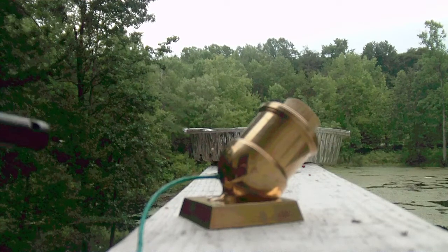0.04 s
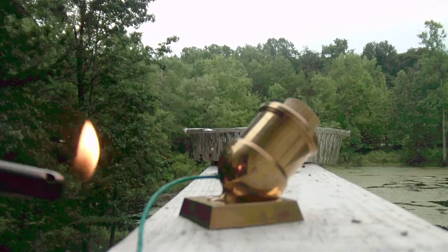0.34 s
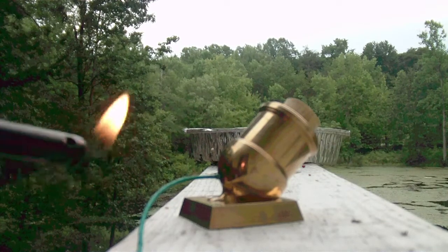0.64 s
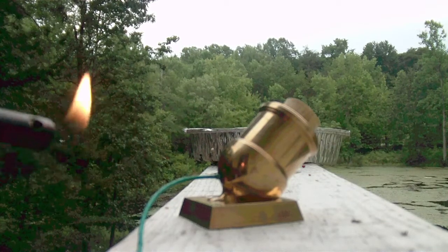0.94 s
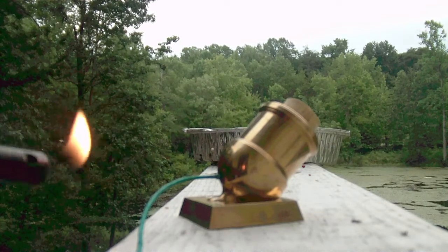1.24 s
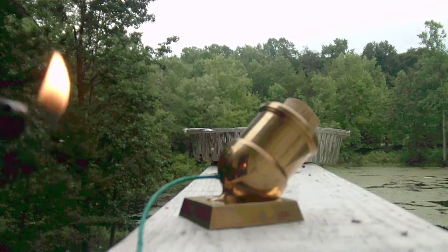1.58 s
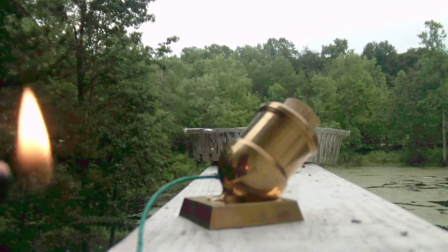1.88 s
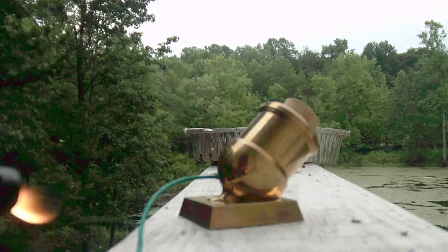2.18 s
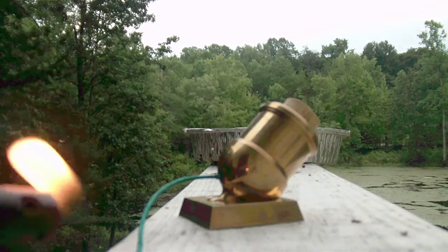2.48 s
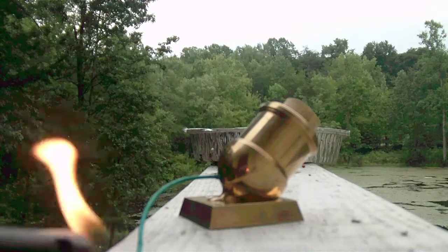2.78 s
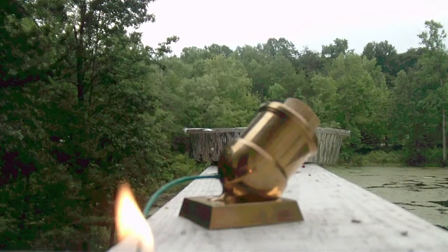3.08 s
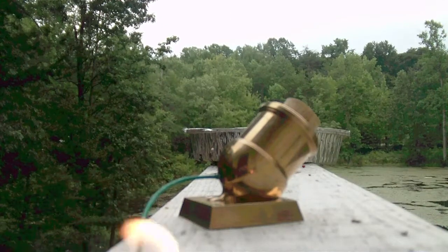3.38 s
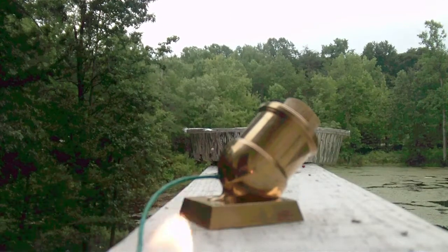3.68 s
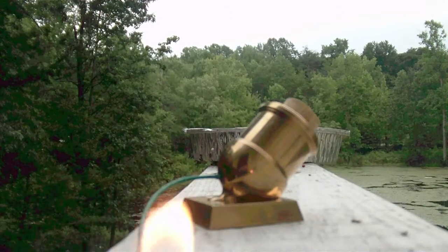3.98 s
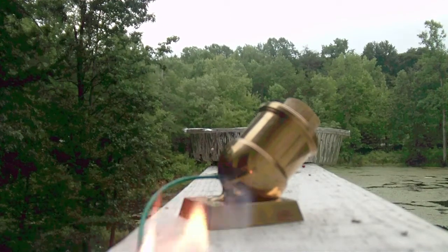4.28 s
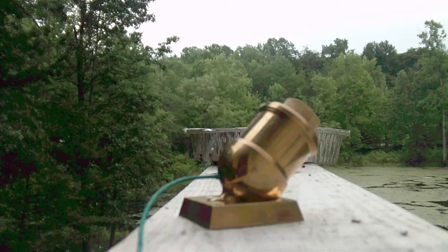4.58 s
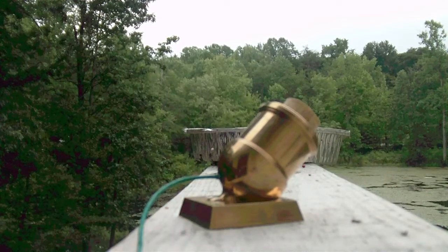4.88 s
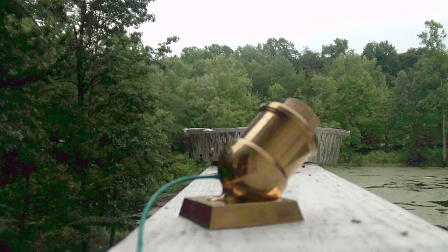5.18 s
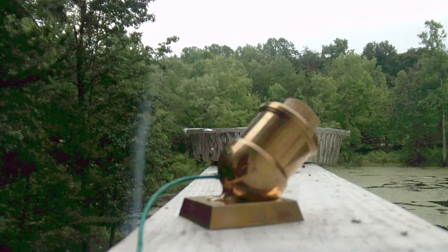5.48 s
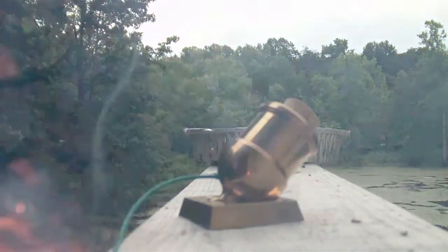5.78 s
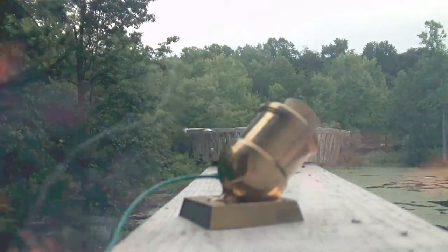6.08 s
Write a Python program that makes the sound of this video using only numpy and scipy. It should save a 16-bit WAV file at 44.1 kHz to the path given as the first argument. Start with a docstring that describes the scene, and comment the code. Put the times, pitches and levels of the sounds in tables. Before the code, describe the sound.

A lighter snaps on over rasping insects, then a fuse crackles and a miniature mortar goes off with a harsh bang.

```python
"""A pond with insects, a few frogs and a far bird; a small brass mortar stands on a wooden rail.
Insects scrape their wings over low rumble and rustling leaves. A gas lighter snaps on and hisses.
The fuse spits and flares as powder grains burst, and the mortar fires with a shriek of gas.
The blast overloads the close microphone and rolls back from the trees; smoke buffets the port."""
import sys
import numpy as np
from scipy import signal
from scipy.fft import rfft, irfft
from scipy.io import wavfile

SR = 44100
rng = np.random.default_rng(int(sys.argv[2]) if len(sys.argv) > 2 else 0)


def generate_wav(sig):
    """Save sig (samples, or channels by samples) to the path in sys.argv[1] as 16-bit PCM at SR."""
    pcm = np.round(np.clip(np.atleast_2d(sig).T, -1, 1) * 32767).astype(np.int16)
    wavfile.write(sys.argv[1], SR, pcm)


N = 270774
T = np.arange(N) / SR
GAS_OFF_S, FIRE_S = 4.49, 5.6455

# air rumble, far leaves: (frequency [Hz], density [dB])
RUMBLE_SPECTRUM = [(16, -37), (28, 4), (54, 4), (141, -3.5), (198, -10), (232, -12.5), (400, -10),
                   (520, -49), (880, -120)]
RUSTLE_SPECTRUM = [(120, 9.5), (250, 10), (420, 5), (700, 1.5), (1500, -2.5), (2700, -1.5), (4500, 5),
                   (5500, 1), (6500, -2.5), (8500, -7.5), (9800, -8), (11000, -17), (15500, -20)]
# common swell of leaves and insects: (time [s], gain [dB])
BACKGROUND_SWELL = [(0, 2), (.6, -1.5), (1.5, -4), (1.7, -6), (2.15, -5), (2.24, -3), (2.85, 2.5),
                    (3.65, 1), (4.45, 5.5), (5.1, 1.5), (5.6, 0)]
# insect chorus: (time [s], level [dB])
CHORUS_LEVEL = [(0, -48.5), (.8, -55), (2.1, -54.5), (2.7, -45), (3.8, -47), (4.35, -37), (4.65, -74),
                (5.6, -45)]
# chorus bands: (centre [Hz], width [Hz], gain [dB])
CHORUS_BANDS = [(4905, 290, -2.5), (7290, 570, -1), (9550, 260, -16), (11800, 150, -26)]
# further katydid rasps: the main katydid's first call, then a neighbour's answers: (centre [s], level [dB])
KATYDID_EXTRA_CALLS = [(.05, -42.5), (.282, -43.5), (.48, -44), (4.85, -48), (5.2, -45)]
# igniter and trigger blows: (time [s], gain [dB], contact cutoff [Hz])
LIGHTER_SNAPS = [(.197, 6.5, 14000), (0.1989, -4, 6000), (.2112, -38, 3000)]
# lighter barrel modes: (frequency [Hz], gain [dB], t60 [s])
LIGHTER_MODES = [(930, -15.5, 0.034), (1584, -9, 0.057), (1760, -9, 0.049), (2990, -4, 0.033),
                 (3320, -6.5, 0.03), (4190, 3, 0.015), (4550, -0.5, 0.021), (6800, -2, 0.031),
                 (6880, -2, 0.039), (7160, 3.5, 0.029), (10600, -11, 0.058)]
# gas jet as the nozzle moves: (time [s], level [dB])
GAS_LEVEL = [(.25, -49), (.57, -67), (.95, -49), (1.5, -46.5), (1.7, -57), (2.15, -68), (2.2, -52),
             (2.71, -50), (2.75, -39.5), (2.97, -39), (3.38, -53), (4.4, -44)]
# gas jet: (frequency [Hz], density [dB])
GAS_SPECTRUM = [(1000, -21), (3000, -19.5), (4550, -4), (5550, 2.5), (6450, -4.5), (7200, -0.5),
                (8300, -11.5), (9400, -10.5), (10600, -42), (15500, -34)]
# low thumps: the lighter case at its snap and release, then puffs of air at the shot: (time [s], peak [dB],
# frequency [Hz])
LOW_THUMPS = [(.21, -22, 170), (.236, -28, 99), (4.539, -23.5, 72), (5.701, -17, 74), (5.999, -0.5, 92),
              (6.008, -0.5, 130), (6.0595, 2, 128)]
# far drone: (centre [s], length [s], level [dB])
DRONE_SWELLS = [(.5, 0.42, -47.5), (2.76, 0.68, -48.5), (3.94, 0.69, -50.5), (4.824, 0.31, -45.5)]
# frog calls: (time [s], pitch [Hz], level [dB])
FROG_PLUNKS = [(.73, 376, -43.5), (.84, 384, -37.5), (1.215, 370, -42.5), (1.78, 369, -44),
               (2.315, 364, -41), (2.995, 387, -38.5), (3.33, 590, -40.5), (3.92, 281, -35),
               (4.099, 409, -34.5), (5.13, 391, -35.5)]
# sharpest fuse spits: (time [s], gain [dB])
FUSE_SPITS = [(3.8044, -4.5), (3.8439, -2), (3.9352, -1), (3.9614, -4), (3.9987, -4), (4.0286, -4.5),
              (4.0878, -6.5), (4.1051, 1), (4.2135, -2), (4.2274, 2), (4.2419, 4.5), (4.3203, 1),
              (4.3465, 1), (4.3686, -6), (4.4049, -2), (4.4255, -3), (4.5024, 6), (4.6295, -14),
              (4.8342, -10), (4.8883, -11.5), (4.9192, -13), (4.9662, -14), (4.9925, -17), (5.03, -11.5),
              (5.477, -8), (5.5067, -13), (5.5813, -12.5), (5.603, -17)]
# fuse catching, smouldering, quickening at the touch hole: (time [s], vigour [dB])
FUSE_VIGOUR = [(3.98, -12), (4.16, -8), (4.22, 0.5), (4.36, -3), (4.52, 0), (4.57, -7.5), (4.75, -16.5),
               (4.86, -7.5), (5.08, -17), (5.44, -17.5), (5.62, -7.5)]
# powder flares: (centre [s], length [s], gain [dB])
FUSE_FLARES = [(4.111, 0.0049, -11.5), (4.124, 0.0086, -17.5), (4.201, 0.014, -10.5), (4.288, 0.018, -1),
               (4.302, 0.019, -10.5), (4.457, 0.016, -12.5), (4.529, 0.0099, -9), (5.582, .0074, -27.5),
               (5.638, 0.027, -29.5)]
# hollow fuse pops: (time [s], level [dB], centre [Hz])
FUSE_POPS = [(4.467, -10.5, 3220), (4.4853, -7, 3370), (4.4877, 3.5, 3080), (4.504, -13.5, 2540)]
# roar of the shot: (frequency [Hz], density [dB])
ROAR_SPECTRUM = [(60, -26), (150, -15), (260, -6), (430, -5.5), (700, -7), (1400, -4), (2200, -2),
                 (3300, 0.5), (6000, -1), (9200, -1.5), (10400, -5.5), (11600, -12.5), (15500, -14)]
# air pushed by blast, then smoke: (time [s], level [dB])
GUST_LEVEL = [(5.64, -13), (5.7, -22.5), (5.76, -23.5), (5.87, -34), (5.92, -17.5), (6.01, -14),
              (6.14, -15)]
# that gust: (frequency [Hz], density [dB])
GUST_SPECTRUM = [(20, -16), (38, 3.5), (70, 0), (150, -3.5), (250, -10), (500, -27), (1500, -60)]


def from_db(db):
    """Decibels to gain."""
    return 10 ** (np.asarray(db) / 20)


def unit_rms(x):
    """Scale to rms 1."""
    return x / np.sqrt(np.mean(x ** 2) + 1e-20)


def level(rows):
    """Gain curve from (time [s], level [dB]) rows."""
    return from_db(np.interp(T, *np.transpose(rows)))


def butter(x, hz, kind, order=2):
    """Butterworth filter."""
    return signal.sosfilt(signal.butter(order, hz, kind, fs=SR, output="sos"), x + 1e-18)


def noise(spectrum):
    """Coloured noise, rms 1."""
    hz, db = np.transpose(spectrum)
    bins_hz = np.maximum(np.arange(N // 2 + 1) * SR / N, 1)
    gain = from_db(np.interp(np.log(bins_hz), np.log(hz), db, left=-90, right=-90))
    return unit_rms(irfft(rfft(rng.standard_normal(N)) * gain, N))


def band(hz, width_hz):
    """Band noise, rms 1."""
    edges_hz = [hz - width_hz / 2, hz + width_hz / 2]
    return unit_rms(butter(rng.standard_normal(N), edges_hz, "band", order=3))


def wander(hz):
    """Low-passed noise, rms 1."""
    return unit_rms(butter(rng.standard_normal(N), hz, "low"))


def ring(x, hz, t60_s):
    """One mode; a unit click rings at height 1."""
    r, w = from_db(-60 / (t60_s * SR)), 2 * np.pi * hz / SR
    return signal.lfilter([0, np.sin(w)], [1, -2 * r * np.cos(w), r * r], x + 1e-18)


def click(s):
    """Unit impulse."""
    return 1. * (np.arange(N) == round(s * SR))


def decay(s, t60_s):
    """Jump to 1, exponential fall."""
    return (T >= s) * np.exp(-np.log(1000) * np.clip((T - s) / t60_s, 0, 10))


def swell(s, length_s):
    """Bell envelope."""
    return np.exp(-np.minimum((2 * (T - s) / length_s) ** 2, 20))


def flat_top(s, length_s):
    """Flat envelope, abrupt ends."""
    return 1 / (1 + (2 * (T - s) / length_s) ** 8)


def wing_phase(rate_hz, jitter):
    """Phase, 0-1, of an uneven wing beat."""
    return np.cumsum(rate_hz * (1 + jitter * wander(10))) / SR % 1


def call_times(first_s, period_s, slowing_s, count):
    """Onsets; the period grows by slowing_s per call."""
    k = np.arange(count)
    return first_s + period_s * k + slowing_s * k ** 2 / 2


def air(background):
    """Low rumble and far rustling leaves."""
    return from_db(-44.5) * noise(RUMBLE_SPECTRUM) + from_db(-45) * background * noise(RUSTLE_SPECTRUM)


def chorus():
    """Massed insects: narrow bands pulsed by wing strokes."""
    bands = sum(from_db(db) * band(hz, width_hz) for hz, width_hz, db in CHORUS_BANDS)
    pulsing = .62 + .25 * np.sin(np.pi * wing_phase(48, jitter=.113)) ** 2
    return level(CHORUS_LEVEL) * bands * pulsing


def cricket(background, centre_hz=6040, sag_hz=240, end_s=4.4):
    """Even trill, blurred by leaves; pitch sags through each wing stroke."""
    stroke = wing_phase(54.6, jitter=.032)
    pitch_hz = centre_hz + sag_hz * (.5 - stroke) + 45 * wander(63)
    pulses = unit_rms(np.sin(2 * np.pi * np.cumsum(pitch_hz) / SR) * np.sin(np.pi * stroke) ** 4)
    blur = from_db(-9) * band(centre_hz, width_hz=160)
    return from_db(-52) * background ** .85 * (T < end_s) * unit_rms(pulses + blur)


def chirping_insect(background):
    """Thin, high wing chirps, slowing."""
    times_s = call_times(first_s=.01, period_s=.188, slowing_s=.00127, count=28)
    chirps = sum(swell(s, length_s=.13) for s in times_s)
    return from_db(-58) * background * chirps * band(9200, width_hz=130)


def katydids(background, rasp_s=.049, lengthening=1.024):
    """Wing rasps, about three a second, tiring; a neighbour answers, others rasp far off."""
    teeth = .3 + np.sin(np.pi * wing_phase(125, jitter=.15)) ** 4
    rasp = unit_rms(teeth * band(4120, width_hz=520))
    times_s = call_times(first_s=.122, period_s=.2975, slowing_s=.00132, count=18)
    calls = from_db(-46) * sum(flat_top(s, rasp_s * lengthening ** k) for k, s in enumerate(times_s))
    linger = from_db(-52.5) * sum(swell(s, length_s=.08) for s in times_s)
    far = from_db(-56.5)
    answers = sum(from_db(db) * flat_top(s, rasp_s) for s, db in KATYDID_EXTRA_CALLS)
    return rasp * (background * (calls + linger + far) + answers)


def lighter():
    """The hammer rings the barrel and rattles the case; a spring shimmers, gas hisses."""
    snap_s = LIGHTER_SNAPS[0][0]
    blows = sum(from_db(db) * butter(click(s), hz, "low", order=1) for s, db, hz in LIGHTER_SNAPS)
    barrel = sum((-1) ** k * from_db(db) * ring(blows, hz, t60_s)
                 for k, (hz, db, t60_s) in enumerate(LIGHTER_MODES))
    rattle = unit_rms(butter(butter(rng.standard_normal(N), 820, "high"), 9100, "low"))
    rattle *= from_db(-3) * decay(snap_s, t60_s=.041) + from_db(-16) * decay(snap_s, t60_s=.13)
    hollow = from_db(-17) * band(1770, width_hz=440) * decay(snap_s, t60_s=.097)
    spring = from_db(-49.5) * band(10500, width_hz=5000) * decay(snap_s, t60_s=.75)
    gas = level(GAS_LEVEL) * noise(GAS_SPECTRUM) * (T > snap_s) * (T < GAS_OFF_S)
    return from_db(-9) * barrel + rattle + hollow + spring + gas


def buffeting():
    """Low thumps: the lighter case knocks at its snap and release; air puffs on the microphone port at the
    shot, and a gust after it."""
    out = level(GUST_LEVEL) * noise(GUST_SPECTRUM) * (T > FIRE_S)
    for s, db, hz in LOW_THUMPS:
        phase = np.clip(2 * np.pi * hz * (T - s), -10, 10)
        out += from_db(db) * phase * np.exp((1 - phase ** 2) / 2)
    return out


def ticking_insect(background, lead_s=.038, gap_s=.018, first_run_s=.15, shrink=.9):
    """A lone tick, then a run, shorter each time; each tick is a scrape falling in pitch."""
    out, age_s = np.zeros(N), np.arange(SR // 60) / SR
    start_hz, end_hz, fall_s, peak_s = 4500, 2850, .006, .0022
    grit = .85 + .45 * band(450, width_hz=700)
    glide_hz = end_hz + (start_hz - end_hz) * np.exp(-age_s / fall_s)
    envelope = (age_s / peak_s * np.exp(1 - age_s / peak_s)) ** 2
    for k, start_s in enumerate(call_times(first_s=.322, period_s=.257, slowing_s=.0064, count=12)):
        run_s = start_s + lead_s + np.arange(0, first_run_s * shrink ** k, gap_s)
        for s, (late_ms, spread_db, detune) in zip([start_s, *run_s], rng.standard_normal((16, 3))):
            i = int((s + late_ms / 1000) * SR)
            tick = envelope * np.sin(2 * np.pi * np.cumsum(glide_hz * (1 + .025 * detune)) / SR)
            out[i:i + len(age_s)] += from_db(-35 + spread_db) * tick
    return background * grit * out


def drone():
    """A far, low hum that comes and goes."""
    swells = sum(from_db(db) * swell(s, length_s) for s, length_s, db in DRONE_SWELLS)
    return swells * band(197, width_hz=41)


def frogs(peak_s=.015, sag_per_s=1.9):
    """Plunks like a slack string, sinking in pitch."""
    out, age_s = np.zeros(N), np.arange(SR // 8) / SR
    croak = from_db(-15) * (band(900, width_hz=280) + band(340, width_hz=100))
    envelope = (age_s / peak_s * np.exp(1 - age_s / peak_s)) ** 2
    for s, hz, db in FROG_PLUNKS:
        span = int(s * SR) + np.arange(len(age_s))
        tone = np.sin(2 * np.pi * np.cumsum(hz * (1 - sag_per_s * age_s)) / SR)
        out[span] += from_db(db) * envelope * (tone + croak[span])
    return out


def bird():
    """One far chuck, lingering in the trees."""
    chuck = from_db(-46) * band(2150, width_hz=850) * flat_top(3.337, length_s=.042)
    linger = from_db(-54) * band(2340, width_hz=130) * decay(3.34, t60_s=1.1)
    return chuck + linger


def fuse(sparks_per_s=450, grains_per_s=7000):
    """Each bursting grain is a tiny pressure step; flares are dense bursts with a puff of gas."""
    vigour = level(FUSE_VIGOUR)
    rate_per_s = sparks_per_s * vigour ** 1.35 * (T > FUSE_VIGOUR[0][0]) * (T < FIRE_S)
    spread_db = 5.35 * np.minimum(rng.exponential(1, N), 3)
    sizes = from_db(-17 + spread_db) * vigour ** .62 * rng.choice([-1, 1], N)
    sparks = sizes * (rng.random(N) < rate_per_s / SR)
    spits = from_db(2.8) * sum(from_db(db) * click(s) for s, db in FUSE_SPITS)
    flares = sum(from_db(db) * flat_top(s, length_s) for s, length_s, db in FUSE_FLARES)
    grains = unit_rms(rng.standard_normal(N) * (rng.random(N) < grains_per_s / SR))
    bursts = sparks + spits + from_db(-4.5) * grains * flares
    # a small source radiates mostly treble
    sharp = butter(bursts, 4900, "high", order=1) + .016 * butter(bursts, 220, "high")
    top = .19 * butter(sharp, 10700, "high", order=4)
    direct = from_db(8.5) * (butter(sharp, 10290, "low", order=6) + top)
    gas = from_db(-26) * flares * band(666, width_hz=720)
    # scatter off rail and barrel
    scatter = rng.standard_normal(SR // 20) * decay(0, t60_s=.013)[:SR // 20]
    reflected = from_db(-13) * signal.fftconvolve(direct, scatter / np.linalg.norm(scatter))[:N]
    pops = sum(from_db(db) * band(hz, width_hz=2950) * decay(s, t60_s=.015) for s, db, hz in FUSE_POPS)
    return direct + gas + reflected + pops


def shot(attack_s=.0035, hold_s=.3, fall_db_per_s=19.5):
    """Muzzle gas shrieks far over full scale; the roar returns from the trees."""
    jet = from_db(9) * band(7840, width_hz=3800) * decay(FIRE_S + .0016, t60_s=.096)
    bark = from_db(-5) * band(4700, width_hz=2500) * swell(5.676, length_s=.019)
    crack = from_db(1) * decay(FIRE_S, t60_s=.15)
    # later echoes cross more air: duller
    dullness = np.clip((T - 5.84) / .27, 0, 1)
    bright = np.sqrt(1 - dullness) * noise(ROAR_SPECTRUM)
    dull = np.sqrt(dullness) * butter(noise(ROAR_SPECTRUM), 10300, "low", order=3)
    clumps = from_db(.8 * wander(110))   # trunk by trunk
    rolling = from_db(-5.5 - fall_db_per_s * np.maximum(T - FIRE_S - hold_s, 0))
    roar = (bright + dull) * clumps * (rolling + crack)
    return (jet + bark + roar) * np.clip((T - FIRE_S) / attack_s, 0, 1)


def scene():
    """One microphone, both channels alike."""
    background = level(BACKGROUND_SWELL)
    pond = air(background) + katydids(background) + chirping_insect(background) + chorus()
    pond += cricket(background) + ticking_insect(background) + frogs() + bird() + drone()
    mono = pond + lighter() + fuse() + shot() + buffeting()
    return np.array([mono, mono])


def record(dry, cutoff_hz=15600):
    """Input clips at full scale; steep low-pass."""
    lowpass = signal.ellip(10, .1, 80, cutoff_hz, fs=SR, output="sos")
    return signal.sosfilt(lowpass, np.clip(dry, -1, 1))


dry = scene()
out = record(dry)
generate_wav(out)
```